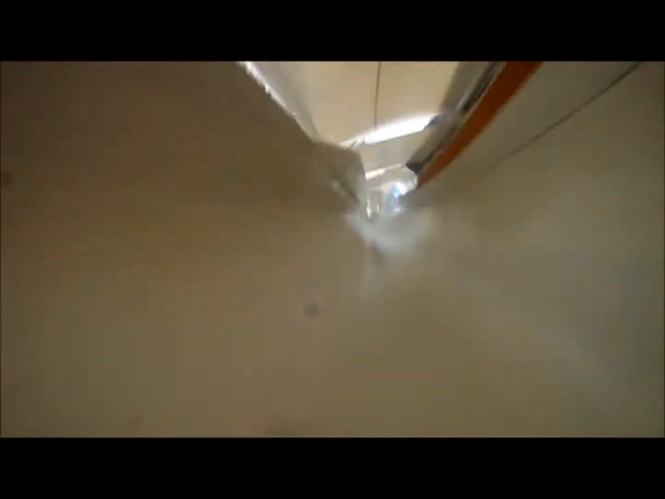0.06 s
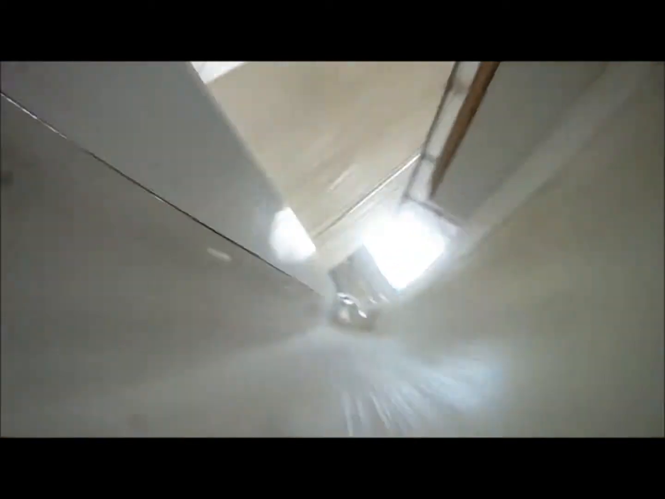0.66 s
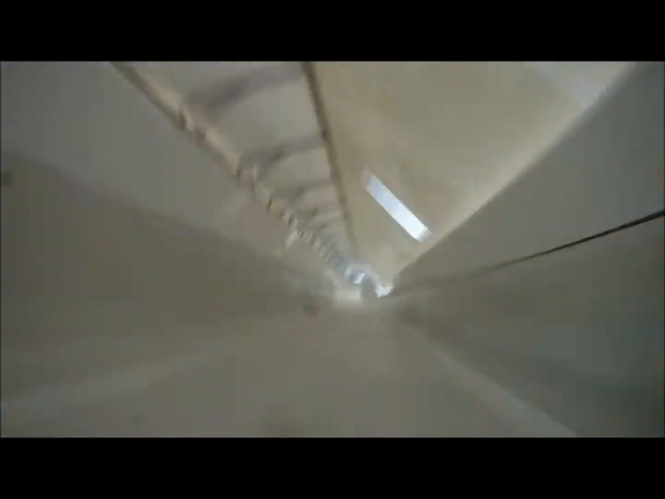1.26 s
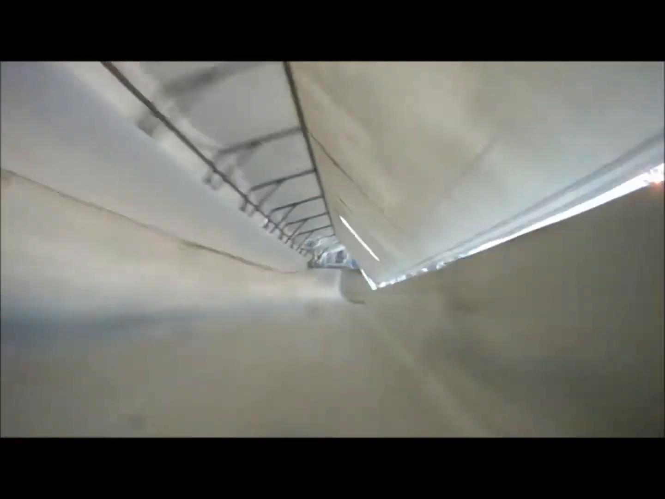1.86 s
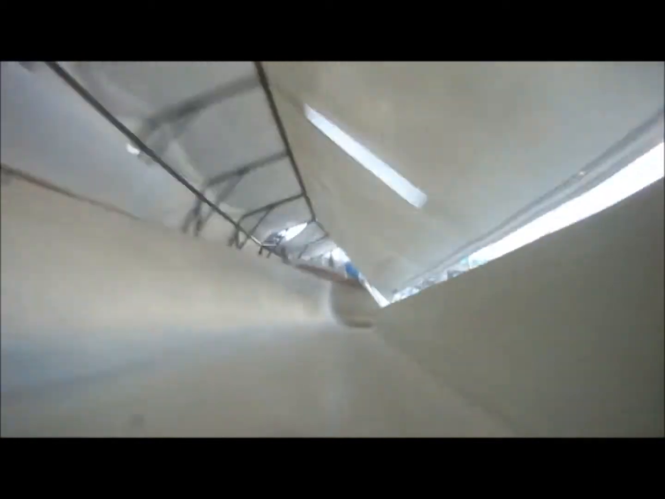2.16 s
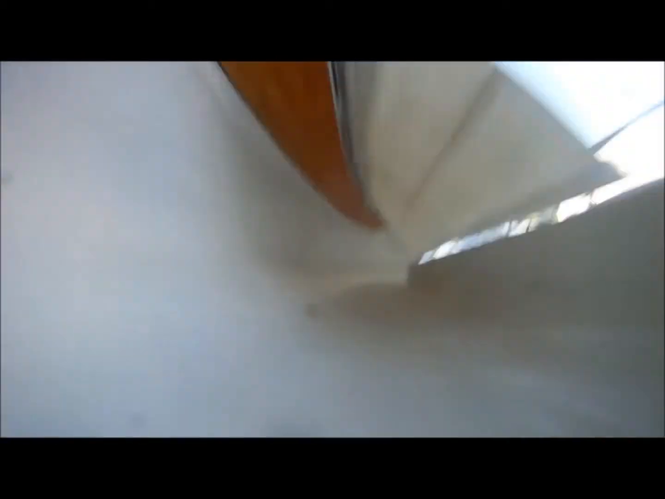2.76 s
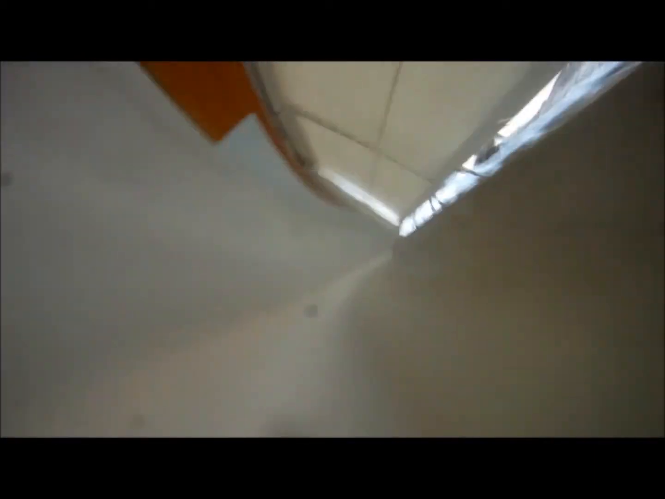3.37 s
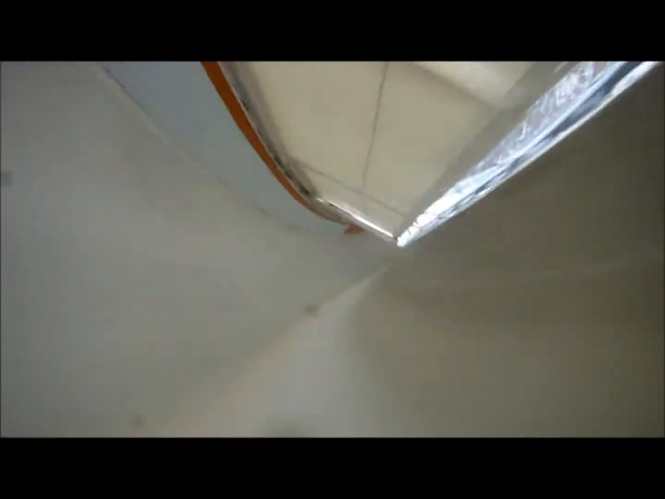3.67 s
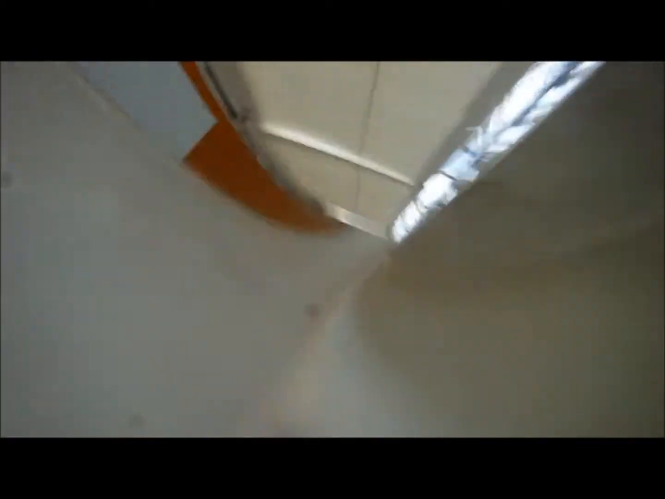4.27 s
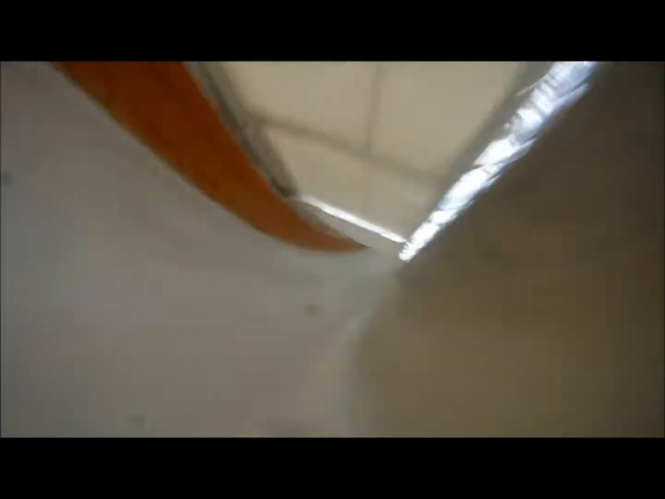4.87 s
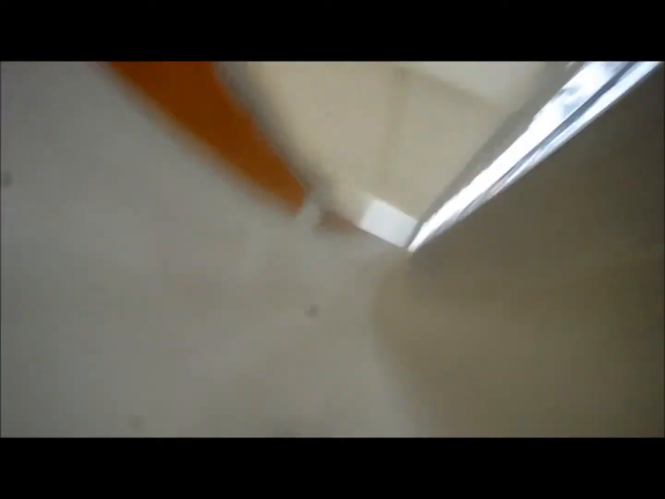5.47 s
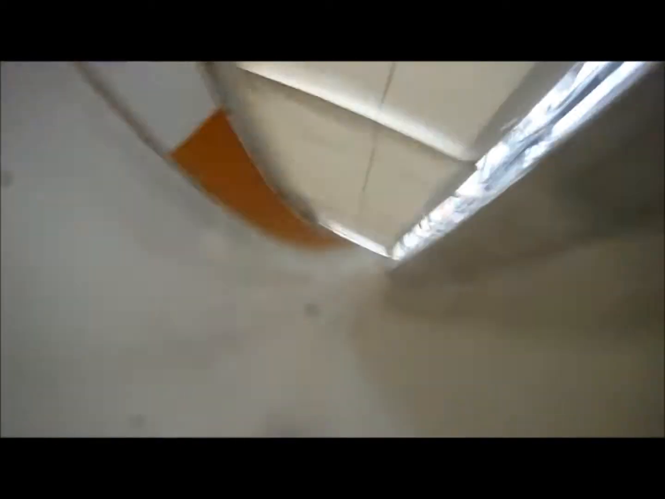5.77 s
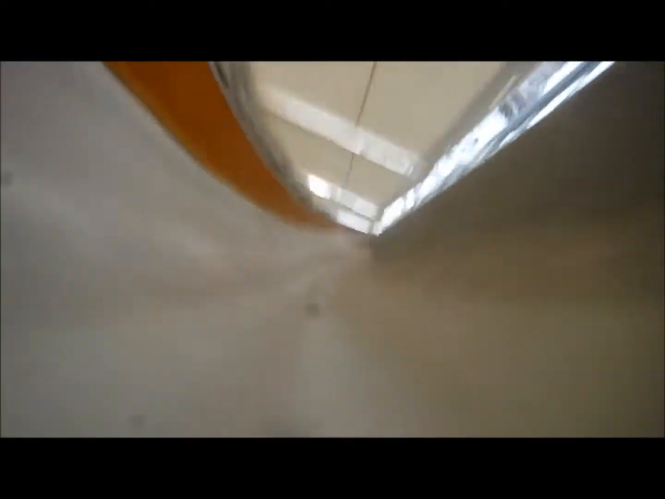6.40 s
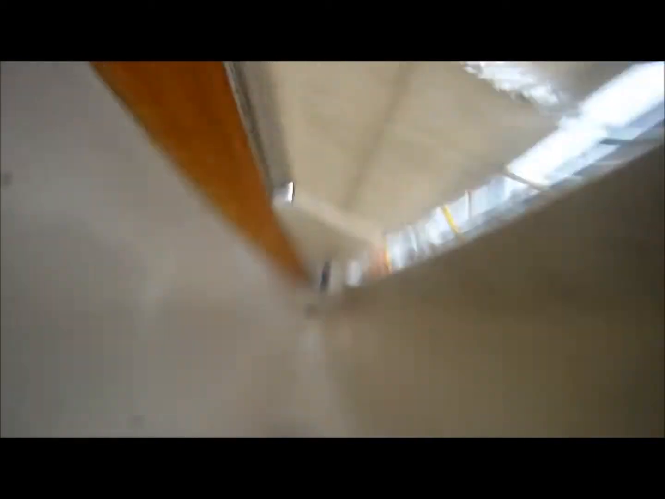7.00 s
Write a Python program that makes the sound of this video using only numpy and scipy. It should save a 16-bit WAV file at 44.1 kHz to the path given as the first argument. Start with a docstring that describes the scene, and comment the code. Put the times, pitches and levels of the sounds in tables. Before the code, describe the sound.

A skeleton sled slides fast down an ice track, heard from a small microphone fixed to its frame. Steel runners scrape continuously, gritty and fluttering, over a lumpy low wind rumble, with a thin fizz in the treble. The first seconds are a lighter glide, with thumps and icy scratches around 0.1, 1 and 2.1 seconds. Short skids flare at 2.4 and 2.8 seconds. At 3 seconds the runners bite into a banked curve and the scrape becomes louder and harsher, easing near 3.6, then building again by 4.4 and staying rough. Bumps keep thudding through the frame, the hardest around 4.9, 5.6, 5.8 and 6.2 seconds, the last three with a sharp knock; each makes the whole sound dip and swell back. From 6.5 seconds several skids surge in quick succession, with the sled still rushing along just past 7 seconds.

```python
"""On an ice track, a skeleton sled runs downhill with a small camera fixed to its frame.
The steel runners scrape, harsher where they bite in the banked curves, over a rumble of wind and frame.
Bumps in the ice jolt the sled; hard jolts make the camera's gain control duck and slowly recover.
The camera's coarse, stepped sampling mirrors the scrape into a thin fizz in the treble."""
import sys
import numpy as np
from scipy import signal
from scipy.fft import rfft, irfft
from scipy.io import wavfile
from scipy.ndimage import uniform_filter1d, minimum_filter1d

SR = 44100
rng = np.random.default_rng(int(sys.argv[2]) if len(sys.argv) > 2 else 0)


def master_out(mix):
    """Clip the mix to full scale and print it as 16-bit PCM to the path in sys.argv[1]."""
    frames = np.transpose(np.atleast_2d(mix))
    ceiling = np.clip(frames, -1, 1)
    pcm = np.round(ceiling * 32767).astype(np.int16)
    wavfile.write(sys.argv[1], SR, pcm)


N = 319284
TIME = np.arange(N) / SR
FREQS = np.fft.rfftfreq(N, 1 / SR)
CAMERA_RATE_HZ = 12000

# How hard the runners dig in. Each row: time in seconds, bite (near 0 on a straight, about 1 at most).
BANK = [(0, 0.14), (1.3, 0.13), (2.2, 0.15), (2.42, 0.29), (2.62, 0.2), (2.89, 0.44), (2.99, 1.14),
        (3.35, 0.67), (3.58, 0.29), (3.85, 0.63), (4.38, .95), (4.6, 0.58), (5.2, 0.73), (5.48, 0.69),
        (5.7, 0.56), (6.4, .55), (6.9, 0.58), (7.24, 0.56)]
# Big bumps in the ice. Each row: time in seconds, push in dB, half-length in seconds.
JOLTS = [(.1444, -3, 0.0019), (.9057, -5.5, 0.0027), (1.0195, -1, 0.004), (2.0804, -5, 0.0032),
         (2.5175, -2.5, 0.0032), (2.6915, 0.5, 0.0019), (3.5204, -3.5, 0.0032), (3.878, 0.2, 0.0031),
         (4.7948, -5.5, 0.0021), (4.8785, 2, 0.0019), (5.4875, -2.5, 0.0027), (5.6102, 3, 0.0011),
         (5.7932, 1, 0.002), (6.158, -4.5, 0.0031), (6.2402, 2.5, 0.0014), (6.5455, -1.66, 0.0017),
         (6.7035, -4.5, 0.0022), (7.0346, -5, 0.003)]


def scrape():
    """Sliding friction: steel on ice surges and chatters as the runners skip over the fine ripple."""
    sway_db = 0.98 * wander(rate_hz=7.6)
    surge_db = wander(rate_hz=51)
    chatter_db = 0.62 * wander(rate_hz=130)
    return amp(runner_db() + sway_db + surge_db + chatter_db) * rush(body_db, patchy_db=2.1, size=1024)


def runner_db(flat_db=-34.5, full_bite_db=5.5):
    """Friction noise grows louder as the runners bite and as they skid."""
    return flat_db + full_bite_db * follow(BANK, TIME) + skid_db()


def skid_db():
    """Sideways slip swells the scrape along a bell curve in dB."""
    # Skids of the runners. Each row: time of the peak in seconds, gain in dB, half-length in seconds.
    skids = [(.5, 2.5, 0.49), (2.428, 9, 0.022), (2.826, 8.5, 0.018), (3.08, 2.5, 0.11), (3.835, 5, 0.032),
             (4.097, 6.5, 0.034), (5.18, 5, 0.032), (5.422, 3, .06), (6.12, 4.5, 0.042), (6.493, 4, 0.089),
             (6.656, 7, 0.045), (6.815, 5, 0.026), (6.937, 8, 0.057)]
    return sum(db * np.exp(-((TIME - s) / length) ** 2) for s, db, length in skids)


def bite(t, per_skid_db=0.055):
    """Under load the runners dig in through the banked curves, and a little more in each skid."""
    return follow(BANK, t) + per_skid_db * np.interp(t, TIME, skid_db())


def body_db(hz):
    """Resonance: the modes of sled and camera case add peaks to the spectrum of the runners."""
    # Runners gliding flat. Each row: frequency in Hz, relative spectral density in dB.
    glide = [(100, -10), (330, 1.5), (560, -1.5), (750, 2.5), (1350, -1), (1750, -5), (2300, -3.5),
             (3100, -11), (3800, -12), (4400, -16.5), (5300, -20)]
    # Modes of sled and case. Each row: frequency in Hz, half-width in Hz, gain in dB.
    modes = [(893, 21, 5), (1114, 125, 5), (1595, 96, 5), (1972, 182, 7.5), (2890, 65, 2), (3476, 247, 7),
             (4945, 484, 8.5)]
    return read(glide, hz) + sum(db * np.exp(-((hz - f) / width) ** 2) for f, width, db in modes)


def rush(colour_db, patchy_db, size):
    """Spectral shaping: noise of steady power whose colour follows the bite, with short random patches."""
    # Change of colour at full bite. Each row: frequency in Hz, gain in dB.
    bite_colour = [(35, 2.5), (100, -6), (200, -3), (380, 7.5), (650, -2), (900, 2), (1100, 1.2),
                   (1400, 5.5), (1850, 11), (2500, 2), (3100, 3.5), (4500, -0.2)]
    frames = dict(nperseg=size, noverlap=size * 3 // 4)
    hz, t, spectra = signal.stft(rng.standard_normal(N), SR, **frames)
    shape = amp(colour_db(hz)[:, None] + read(bite_colour, hz)[:, None] * bite(t))
    patches = uniform_filter1d(rng.standard_normal(spectra.shape), size=10, axis=0)
    patches = unit_rms(uniform_filter1d(patches, size=7, axis=1))
    spectra = spectra * shape / np.linalg.norm(shape, axis=0) * amp(patchy_db * patches)
    return unit_rms(signal.istft(spectra, SR, **frames)[1][:N])


def dulled(x, middle_s=2.52, half_length_s=0.25, treble_db=-4, above_hz=2630):
    """A shelving filter: the treble sinks briefly and comes back."""
    low = irfft(rfft(x) / (1 + (FREQS / above_hz) ** 6), N)
    return low + (x - low) * amp(treble_db * np.exp(-((TIME - middle_s) / half_length_s) ** 2))


def jolts(bumps, lift=0.34, ring=0.35, ring_hz=76, ring_s=0.045):
    """Shock excitation: the sled rides up a bump, slams down, and its frame rings as a damped mode."""
    out = np.zeros(N)
    for s, db, length in bumps:
        near = abs(TIME - s) < 0.2
        t = TIME[near] - s
        after = np.maximum(t, 0)
        rise = lift * np.exp(-((t / length + 1.59) / 2.67) ** 2)  # earlier and broader than the slam
        slam = np.exp(-(t / length) ** 2)
        shudder = ring * np.sin(2 * np.pi * ring_hz * after) * np.exp(-after / ring_s)
        out[near] += amp(db) * (rise - slam - shudder)
    return out


def ripples(per_s=1.2, push_db=-6.5, half_length_s=0.0019):
    """Surface roughness: small bumps fall at random, clear of the big ones, in rows like JOLTS."""
    gaps, sizes = rng.random((40, 2)).T
    times = np.cumsum(0.5 + gaps) / per_s
    return [(s, push_db, half_length_s * 2 ** (size - 0.5)) for s, size in zip(times, sizes)
            if s < TIME[-1] and min(abs(s - row[0]) for row in JOLTS) > 0.05]


def knocks():
    """Impact: the hardest landings send a steep, brief, and so broadband, pulse through the frame."""
    # Blows to the frame. Each row: start in seconds, peak in dB, rise time in seconds.
    blows = [(5.609, -7, 0.00029), (5.7922, -0.5, 0.00031), (6.239, -12, 0.0003)]
    out = np.zeros(N)
    for s, db, rise_s in blows:
        age = np.clip((TIME - s) / rise_s, 0, 40)
        out -= amp(db) * age * np.exp(1 - age)
    return out


def chips(relative_db=-26.5, decay_s=0.0018, lead_s=0.002):
    """Brittle fracture: each big jolt chips the ice, louder the harder it pushes."""
    envelope = sum(burst(s - lead_s, db + relative_db, decay_s) for s, db, _ in JOLTS)
    return through_body(envelope * rng.standard_normal(N), tilt_db_per_octave=1.5)


def cracks():
    """Friction transients: short bursts of noise, some where a runner catches and scratches the ice, others
    (near 0.9, 2.08, 2.68 and 4.87 s) on jolts, further chips of the same kind."""
    # Each row: start in seconds, level in dB, decay time in seconds, tilt in dB per octave.
    clicks = [(0.43, -22.5, 0.019, -1), (.897, -28, 0.011, 6), (1.208, -28, 0.0037, 5),
              (2.075, -23, .0031, 4), (2.681, -29, 0.0054, -10), (4.587, -33, 0.0016, 19),
              (4.621, -22, 0.0021, 2), (4.729, -28, 0.0027, 11), (4.874, -30, .002, 4),
              (5.358, -24, 0.019, -0.5), (5.537, -20, 0.0053, -1.5), (6.044, -25, 0.0029, 3)]
    noise = rng.standard_normal(N)
    return sum(through_body(burst(s, db, decay) * noise, tilt) for s, db, decay, tilt in clicks)


def grit(per_s=90, relative_db=-17, spread_db=5.5):
    """Shot noise: crumbs of ice tick under the runners, many small and a few large."""
    ticks = (rng.random(N) < per_s / SR) * rng.choice([-1, 1], N)
    sizes = amp(spread_db * np.minimum(rng.exponential(1, N), 4))
    force = unit_rms(ticks * sizes) * amp(runner_db() + relative_db)
    return through_body(force, tilt_db_per_octave=2.5)


def through_body(force, tilt_db_per_octave):
    """Forced vibration: a force rings the sled and case; sharper contact tilts the spectrum upwards."""
    colour = amp(body_db(FREQS) + tilt_db_per_octave * np.log2(0.24 + FREQS / 1500))
    return irfft(rfft(force) * unit_rms(colour * (FREQS < CAMERA_RATE_HZ / 2)), N)


def rumble(bumps, flat_db=-19, full_bite_db=-2, skid_share=0.61, gust_db=2, crest=2.1, gap_s=0.0043):
    """Buffeting: wind and frame make a lumpy low noise that gives way for an instant at each jolt."""
    # Wind and frame rumble. Each row: frequency in Hz, relative spectral density in dB.
    spectrum = [(10, -21), (22, 0.5), (38, 0), (60, -3), (100, -2.5), (150, -6.5), (210, -13.5), (300, -22),
                (420, -36.5), (600, -42), (1200, -56.5)]
    lumps = rush(lambda hz: read(spectrum, hz), patchy_db=1.56, size=4096)
    lumps *= amp(gust_db * wander(rate_hz=45))
    lumps = unit_rms(np.tanh(unit_rms(lumps) / crest))  # the strongest gusts level off
    gaps = [1 - np.exp(-np.minimum(abs(TIME - s) / gap_s, 4) ** 4) for s, _, _ in bumps]
    level_db = flat_db + full_bite_db * follow(BANK, TIME) + skid_share * skid_db()
    return amp(level_db) * lumps * np.prod(gaps, axis=0)


def gain_control(x, threshold_db=-9, overreaction=3.185, lag_s=0.0014, attack_s=0.0036,
                 release_s=0.13, pull_db=4.5):
    """Compression: peaks over the threshold pull the gain far down; it holds, then creeps back."""
    smoothed = uniform_filter1d(x.mean(0), size=130, origin=64)
    level_db = 20 * np.log10(abs(smoothed) + 1e-9)
    duck_db = overreaction * np.maximum(np.interp(TIME - lag_s, TIME, level_db) - threshold_db, 0)
    held_db = -minimum_filter1d(-duck_db, size=441, origin=220)  # 10 ms hold
    # The exponential release aims pull_db past full gain and stops at full gain.
    recovery = TIME / release_s
    log_peak = np.maximum.accumulate(np.log(held_db + pull_db) + recovery)
    released_db = np.exp(log_peak - recovery) - pull_db
    pole = np.exp(-1 / (attack_s * SR))
    return x * amp(-signal.lfilter([1 - pole], [1, -pole], released_db))


def sample_and_hold(x, edge_hz=5550):
    """Spectral imaging: slow sampling with held steps mirrors the sound around the sampling rate."""
    narrow = irfft(rfft(x) / np.sqrt(1 + (FREQS / edge_hz) ** 44), N)
    mirrored = narrow * (1 + 2 * np.cos(2 * np.pi * CAMERA_RATE_HZ * TIME))
    return irfft(rfft(mirrored) * np.sinc(FREQS / CAMERA_RATE_HZ), N)


def burst(s, db, decay_s):
    """Exponential decay after an instant onset."""
    return amp(db) * (TIME >= s) * np.exp(-np.minimum(abs(TIME - s) / decay_s, 40))


def wander(rate_hz):
    """Random modulation: low-passed noise of rms 1."""
    return unit_rms(irfft(rfft(rng.standard_normal(N)) / (1 + (FREQS / rate_hz) ** 4), N))


def read(points, hz):
    """Interpolation of a spectrum in dB on a log-frequency axis."""
    f, db = np.transpose(points)
    return np.interp(np.log(hz + 1), np.log(f + 1), db)


def follow(rows, t):
    """Linear interpolation of a curve at the times t."""
    return np.interp(t, *np.transpose(rows))


def amp(db):
    """Decibels to amplitude ratio."""
    return 10 ** (np.asarray(db) / 20)


def unit_rms(x):
    """Normalisation to rms 1."""
    return x / np.sqrt(np.mean(x ** 2) + 1e-20)


def scene():
    """Superposition: all sources add at one microphone, which feeds both channels."""
    bumps = JOLTS + ripples()
    sled = dulled(scrape() + grit()) + rumble(bumps) + jolts(bumps) + knocks() + chips() + cracks()
    return np.array([sled, sled])


def record(dry, edge_hz=15400):
    """The camera's signal chain: gain control, soft saturation, stepped sampling and a band limit."""
    levelled = gain_control(dry)
    rounded = levelled / (1 + levelled ** 8) ** (1 / 8)
    low_pass = signal.firwin(511, edge_hz, window=("kaiser", 9), fs=SR)
    return signal.oaconvolve(sample_and_hold(rounded), low_pass[None], "same")


dry = scene()
out = record(dry)
master_out(out)
```